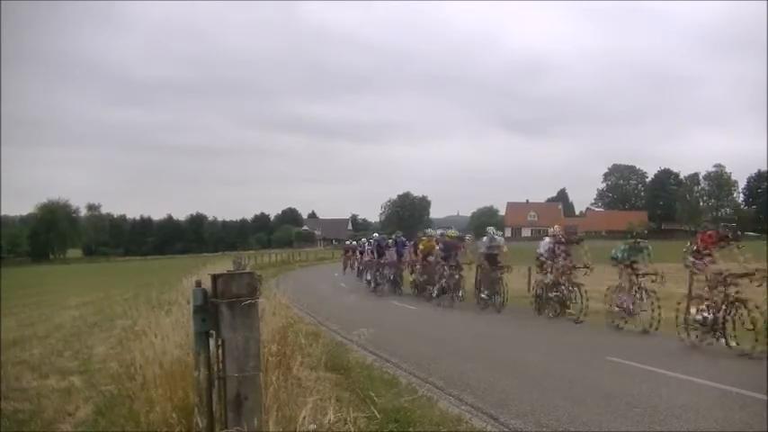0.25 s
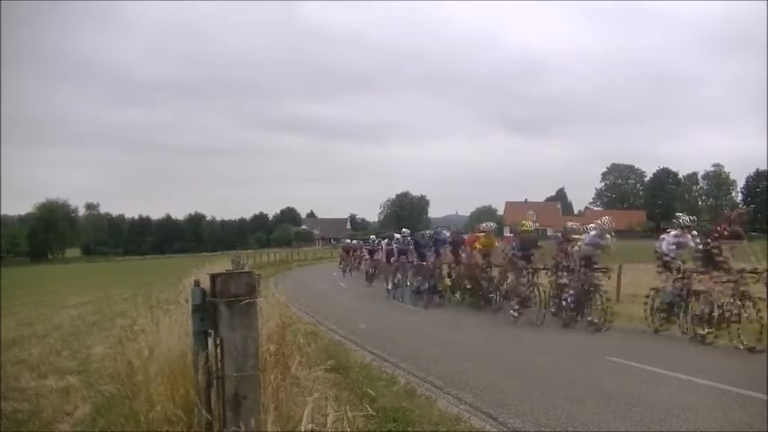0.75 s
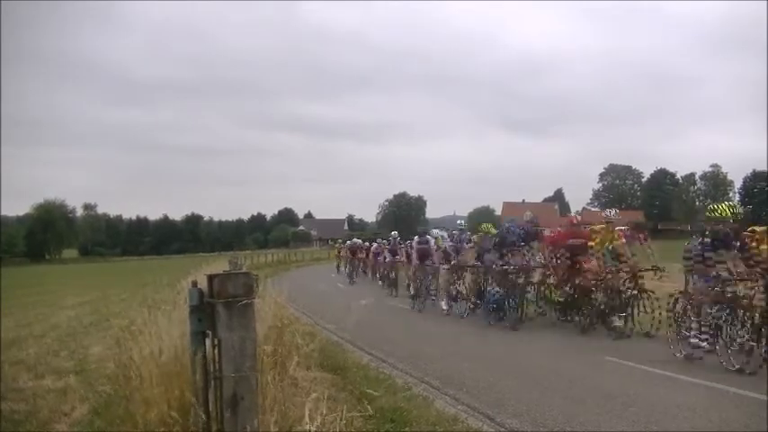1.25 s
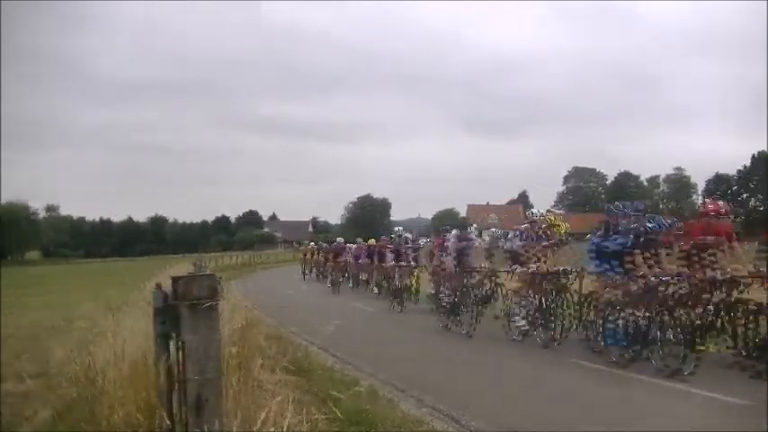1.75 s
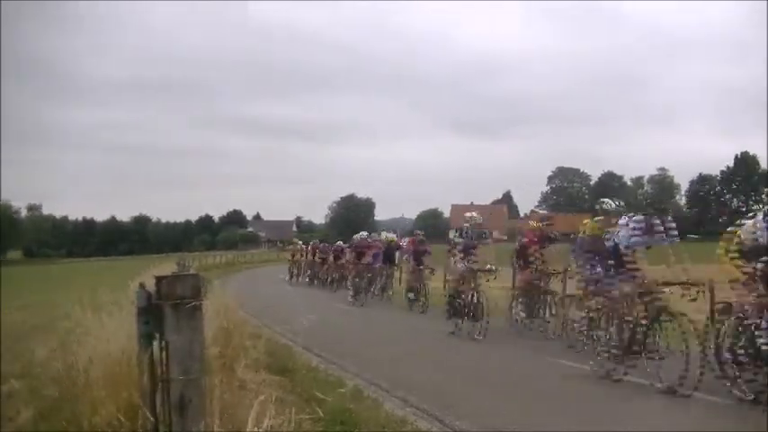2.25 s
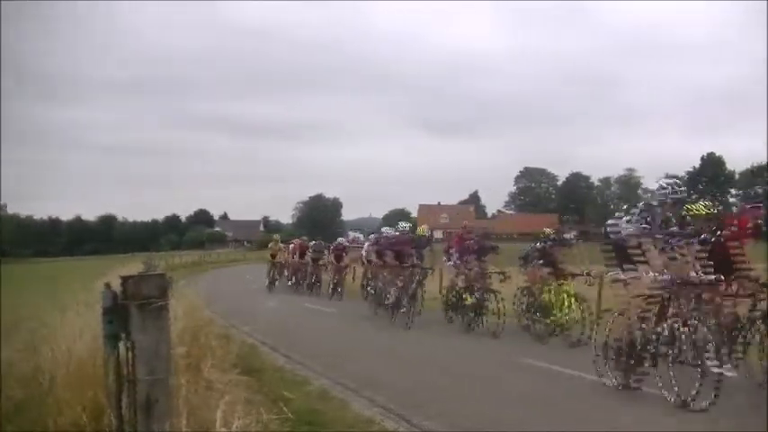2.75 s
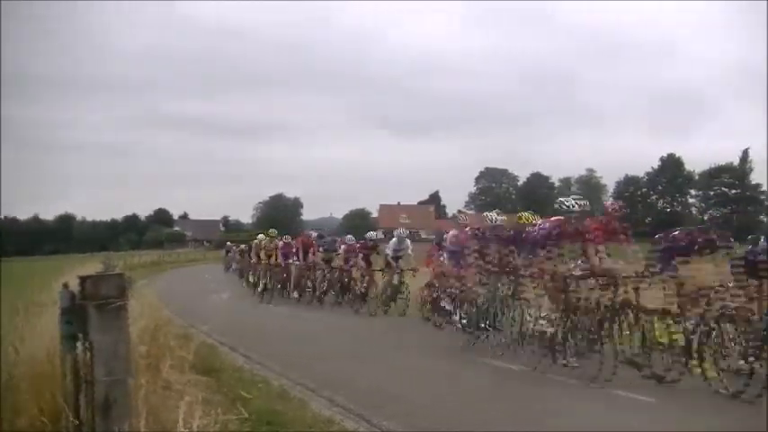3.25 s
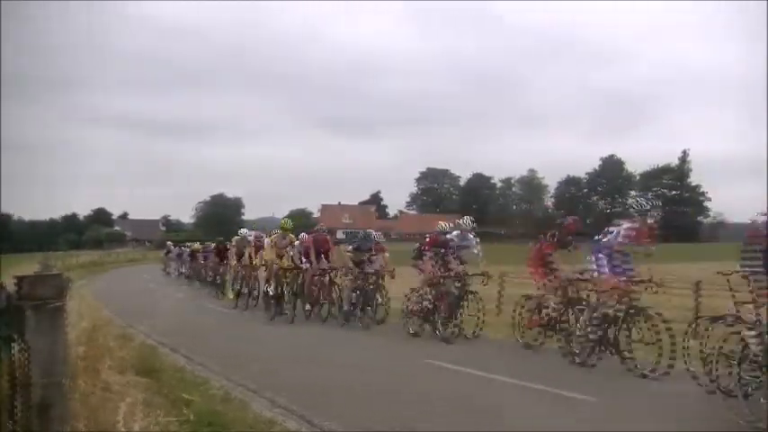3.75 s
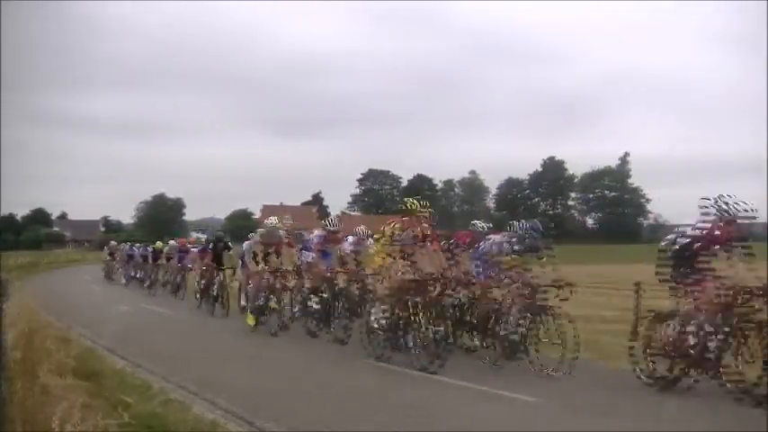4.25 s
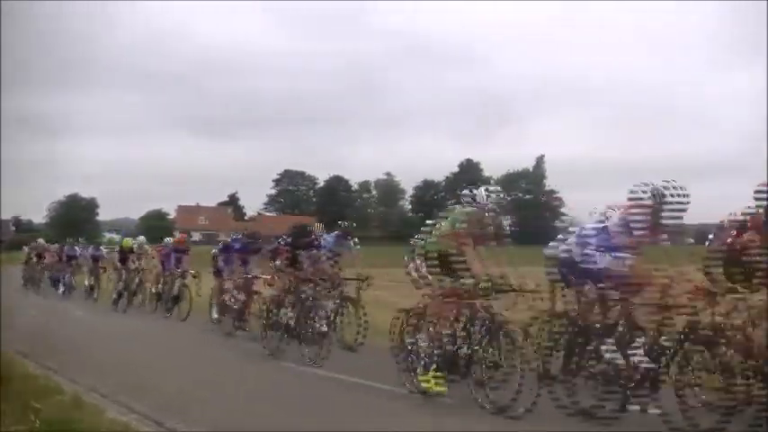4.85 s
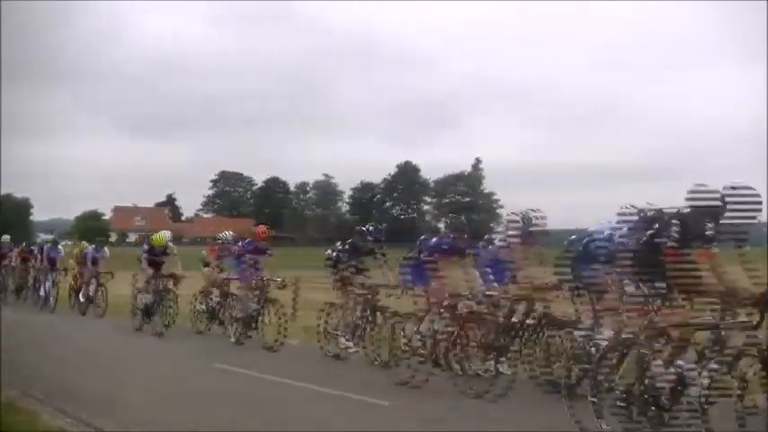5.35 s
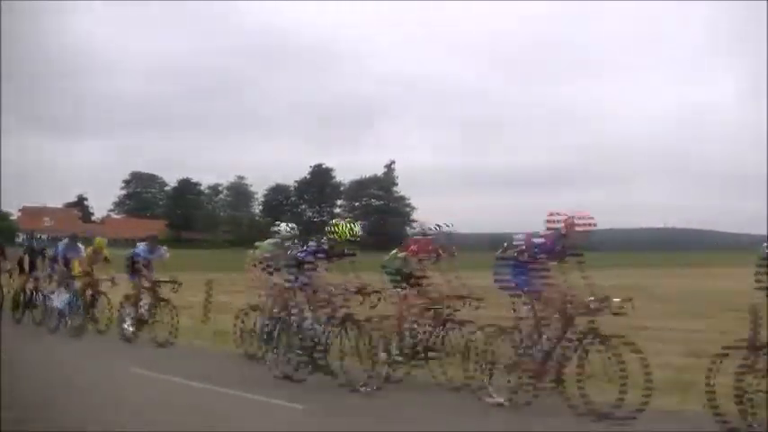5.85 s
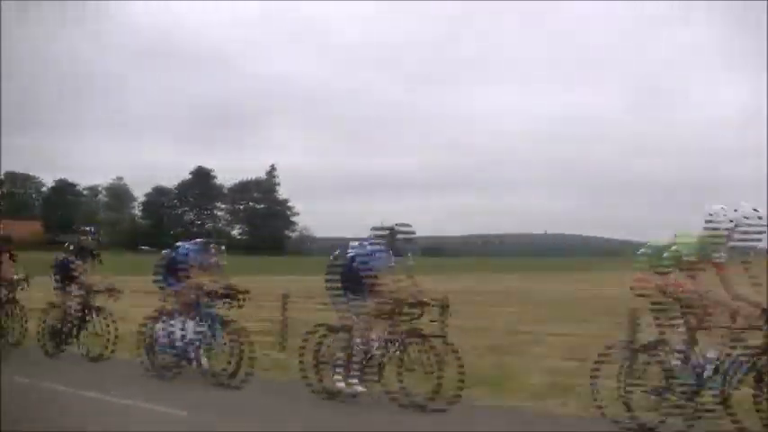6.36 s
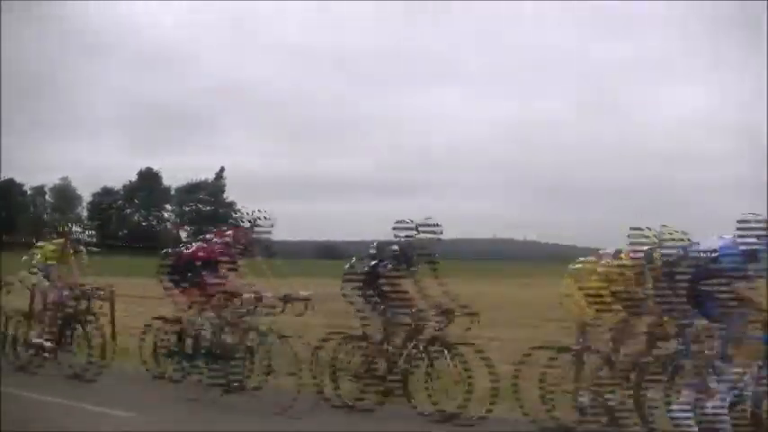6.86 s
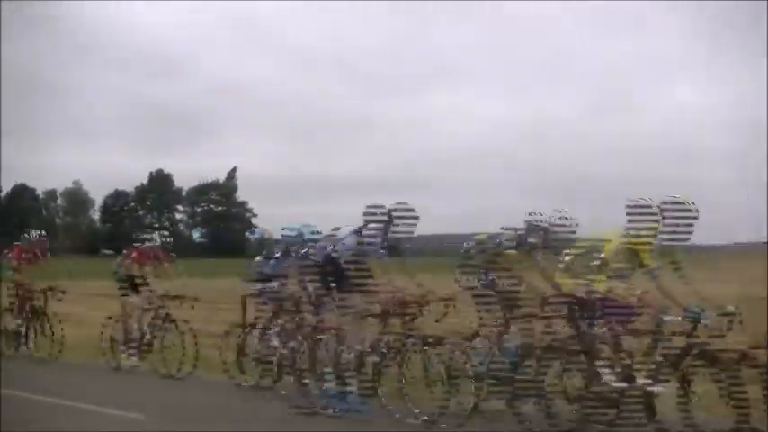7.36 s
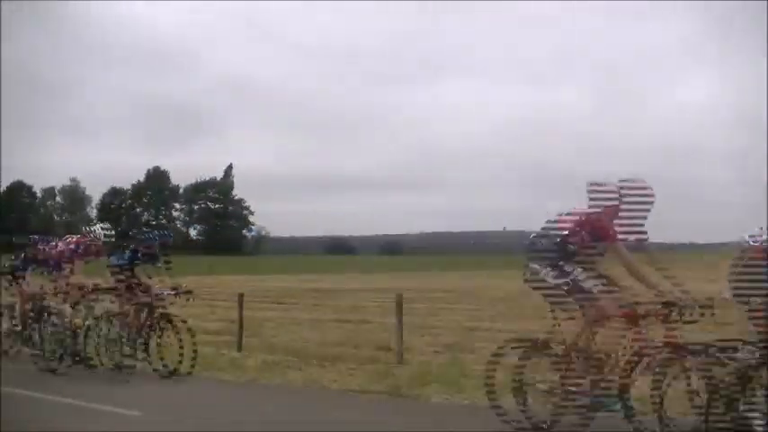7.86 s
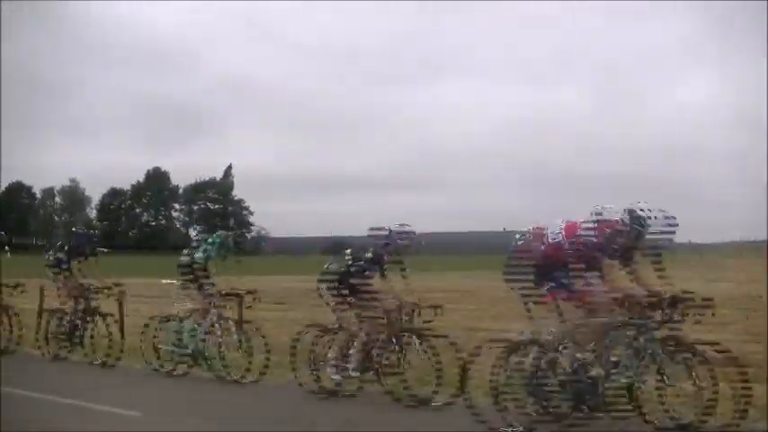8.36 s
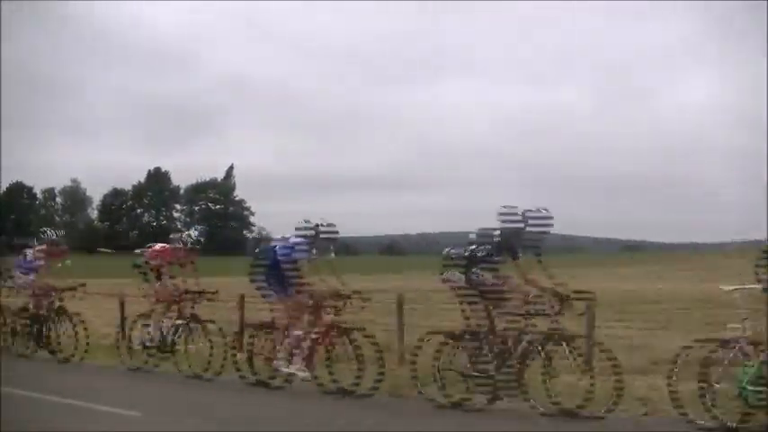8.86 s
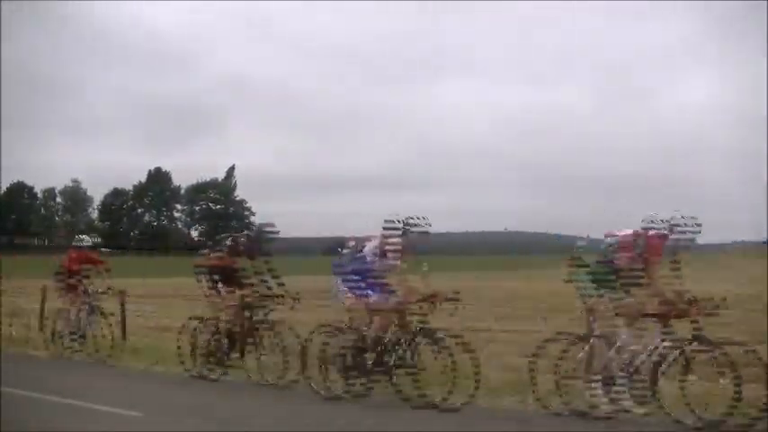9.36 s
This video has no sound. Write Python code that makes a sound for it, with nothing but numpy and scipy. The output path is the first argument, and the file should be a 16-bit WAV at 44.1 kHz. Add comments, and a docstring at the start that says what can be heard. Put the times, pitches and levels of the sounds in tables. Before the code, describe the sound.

Outdoors beside a road, tyres hiss and chains whirr continuously as a pack of racing bikes streams by, a little louder midway. Small ticks, short freewheel ratchets and a couple of bright chain clacks stand out. Near the end come dull knocks on the microphone, low gusts of wind, a brief dropout and a hard snap like a flung stone.

```python
"""Tyres hiss on asphalt as a peloton of racing bicycles streams past a hand-held camera a few metres away.
Spokes cut the air, chains whirr, freewheels ratchet, gears and grit tick. A chain clacks loudly on a frame;
later something snaps sharply. Late on, the camera is bumped, wind buffets its two ports
and the sound cuts out for a third of a second."""
import sys
import numpy as np
from scipy import signal
from scipy.fft import rfft, irfft, next_fast_len
from scipy.io import wavfile
from scipy.ndimage import uniform_filter1d

SR = 44100
rng = np.random.default_rng(int(sys.argv[2]) if len(sys.argv) > 2 else 0)


def bounce(signal):
    """Save signal as a 16-bit WAV file at the path given by the first command-line argument."""
    frames = np.transpose(np.atleast_2d(signal))
    limited = np.clip(frames, -1, 1)
    pcm = np.round(limited * 32767).astype(np.int16)
    wavfile.write(sys.argv[1], SR, pcm)


N = 423801
TIME = np.arange(N) / SR

# groups with noisier chains and spokes: t/s, half length/s, lift/dB
WHIRR_SWELLS = [(1.6, 3.3, 2.2), (3.65, 0.47, 3), (7.9, .12, 3.5)]


def undb(db):
    """Decibels to gain."""
    return 10 ** (np.asarray(db) / 20)


def unit(x):
    """Scale to rms 1."""
    return x / np.sqrt(np.mean(x ** 2))


def across(points, freqs):
    """Read (f/Hz, value) points on a log-frequency axis."""
    hz, value = np.transpose(points)
    return np.interp(np.log(freqs + 1), np.log(hz + 1), value)


def spectrum(x):
    """Spectrum and its axis in Hz."""
    size = next_fast_len(N, True)
    return rfft(x, size), np.arange(size // 2 + 1) * SR / size


def colour(x, points):
    """Shape by (f/Hz, level/dB) points, at rms 1."""
    bins, freqs = spectrum(x)
    return unit(irfft(bins * undb(across(points, freqs)))[..., :N])


def band(x, hz, width_hz):
    """One resonance, gain 1 at its centre."""
    return signal.lfilter(*signal.iirpeak(hz, hz / width_hz, fs=SR), x)


def lift(x, hz, width_hz, db):
    """Raise or lower one band."""
    return x + (undb(db) - 1) * band(x, hz, width_hz)


def high_pass(x, hz, order):
    """Butterworth bass cut."""
    return signal.sosfilt(signal.butter(order, hz, "high", fs=SR, output="sos"), x)


def walk(rate_hz):
    """Smooth random wander, rms 1."""
    hold = int(SR / rate_hz)
    steps = np.repeat(rng.standard_normal(N // hold + 1), hold)[:N]
    return unit(uniform_filter1d(uniform_filter1d(steps, hold), hold))


def fade(t, t60_s):
    """Exponential decay, 60 dB down at t60_s."""
    return np.exp(-np.log(1000) * t / t60_s)


def add(out, s, x):
    """Mix x in at time s."""
    start = max(int(s * SR), 0)
    out[..., start:start + x.shape[-1]] += x[..., :N - start]


def swells(groups):
    """Lift in dB as each group passes."""
    return sum(db * np.exp(-((TIME - s) / half_s) ** 2) for s, half_s, db in groups)


def grit(rate_hz, spread_db):
    """Dense tiny impacts, a few much harder than the rest."""
    hits = rng.random(N) < rate_hz / SR
    hardness = np.minimum(rng.exponential(size=N), 5)
    return unit(hits * rng.standard_normal(N) * undb(spread_db * hardness))


def ports(direct, scattered):
    """Two close ports: alike in the treble, apart in level and phase lower down."""
    # coherence of the ports: f/Hz, likeness/0-1
    coherence = [(60, .8), (130, .3), (290, 0.34), (640, 0.94), (1410, 0.8), (3100, 0.92), (6820, 0.91),
                 (15000, .99)]
    # left minus right: f/Hz, level/dB
    balance = [(110, 0), (200, 3), (380, 3.5), (700, 1.5), (1290, -2), (2380, -2.5), (4400, -.3), (9000, 0)]
    # left lead: f/Hz, phase/rad
    lead = [(60, 0), (340, -.6), (1100, -.6), (2000, -.15), (3450, .2), (4900, 0), (5700, .2), (7600, -.3),
            (8600, 0)]
    (mid, side), freqs = spectrum(np.array([direct, scattered]))
    likeness = np.sqrt(across(coherence, freqs))
    mid = mid * np.sqrt((1 + likeness) / 2)
    side = side * np.sqrt((1 - likeness) / 2)
    lean = undb(across(balance, freqs) / 2) * np.exp(.5j * across(lead, freqs))
    return irfft(np.array([(mid + side) * lean, (mid - side) / lean]))[:, :N]


def wind(breeze_db=-62.5, rise_s=.04, fall_s=.032):
    """Gusts rise, hold and die; their eddies push on one port while pulling on the other."""
    # gusts: t/s, hold/s, level/dB
    gusts = [(5.08, .04, -48), (6.96, 0.13, -46), (7.46, 0.026, -33.5), (8.03, 0.048, -44),
             (8.24, .09, -43), (8.442, 0.5, -34.5), (8.624, 0.032, -34), (8.86, .03, -35.5),
             (9.078, .07, -37.5), (9.345, 0.078, -40), (9.51, .1, -37)]
    # eddy spectrum: f/Hz, level/dB
    eddies = [(40, -45), (100, -33), (180, -14.5), (280, -4.5), (380, -3.5), (500, -5), (700, -4),
              (1000, -12.5), (2000, -36), (5000, -78)]
    force = undb(breeze_db)
    for s, hold_s, db in gusts:
        early, late = np.maximum(s - TIME, 0), np.maximum(TIME - s - hold_s, 0)
        force = force + undb(db) * np.exp(-early / rise_s - late / fall_s)
    left, own = colour(rng.standard_normal((2, N)), eddies)
    right = unit(.68 * own - left)
    flutter = unit(undb(1.9 * walk(90) + 1.5 * walk(25)))
    return np.array([undb(2.5) * left, undb(-3) * right]) * flutter * force


def thumps(cycles=.6, lead_s=.01, body_hz=158.4):
    """Dull knocks on the camera, one leaving its body humming, and a last pop of wind on the microphone."""
    # single-swing pulses: t/s, level/dB, f/Hz, right/left gain, body hums
    pulses = [(6.932, -35, 199, 1.5, False), (6.971, -22.5, 207, 0.7, True), (7.067, -25, 330, -2, False),
              (7.285, -30, 373, 0.84, False), (7.362, -22.5, 342, 1, False), (7.495, -23, 383, -0.3, False)]
    out, t = np.zeros((2, N)), np.arange(SR // 2) / SR
    for s, db, hz, right, hums in pulses:
        turns = hz * (t - lead_s)
        pulse = undb(db) * np.cos(2 * np.pi * turns) * np.exp(-(turns / cycles) ** 2)
        add(out, s - lead_s, np.array([pulse, right * pulse]))
        if hums:
            add(out, s, undb(-33.5) * np.sin(2 * np.pi * body_hz * t) * fade(t, t60_s=.36))
    return high_pass(out, 146, order=3)


def ticks():
    """Short bright bursts from gear changes and flung grit."""
    # ticks: t/s, level/dB, f/Hz
    bursts = [(1.608, -38, 12500), (2.354, -25, 5500), (3.709, -28, 8600), (3.952, -31, 9000),
              (4.206, -22, 4600), (4.517, -28, 11500), (4.895, -17, 3880), (6.967, -23, 6000),
              (7.359, -19, 5470), (7.382, -24, 4250), (8.011, -29, 6800), (8.747, -29, 6300),
              (9.081, -16, 3770)]
    out, t = np.zeros(N), np.arange(SR // 12) / SR
    for s, db, hz in bursts:
        burst = band(band(rng.standard_normal(len(t)), hz, hz / 2), hz, hz / 2)
        add(out, s, undb(db) * unit(burst) * fade(t, t60_s=.02))
    return out


def freewheels(pawl_hz=283.4, decay_cycles=.26):
    """Pawls snap over the ratchet while a rider stops pedalling."""
    # coasting spells: t/s, half length/s, level/dB, ring f/Hz
    coasts = [(0.033, .08, -31, 1990), (1.069, .05, -34, 4670), (1.844, .065, -27.5, 4800),
              (4.244, 0.054, -30.5, 4380), (4.903, .12, -30.5, 4300), (6.718, .17, -30.5, 1740),
              (7.401, 0.12, -28.5, 1820)]
    out, t = np.zeros(N), np.arange(SR // 2) / SR
    for s, half_s, db, hz in coasts:
        start_s = max(s - t[-1] / 2, 0)
        pawls = rng.standard_normal(len(t)) * np.exp(-(pawl_hz * t % 1) / decay_cycles)
        ring = band(band(pawls, hz, .23 * hz), hz, .23 * hz)
        swell = np.exp(-((start_s + t - s) / half_s) ** 2) * signal.windows.tukey(len(t), .1)
        add(out, start_s, undb(db) * unit(ring) * swell)
    return out


def clacks(crack_db=-20):
    """In a gear change the chain strikes the frame and its links rattle, ringing the tubes."""
    # chain strikes: t/s, level/dB, rattle t60/s, blow f/Hz
    strikes = [(1.309, -10, .012, 2600), (1.3103, -9.5, 0.018, 4400), (1.3124, -14, 0.02, 2200),
               (1.32, -15, .05, 4200), (1.351, -21, .03, 2400), (4.2574, -14, 0.014, 4500)]
    # frame modes: f/Hz, level/dB, t60/s
    modes = [(1950, -4, .018), (2420, -2, .015), (2620, -3, .01), (3950, -6, .005), (4600, -2, .007),
             (4950, -3, .005), (7700, -17, .007), (10400, -30, .007)]
    out, t = np.zeros(N), np.arange(SR // 8) / SR
    for s, db, rattle_s, blow_hz in strikes:
        blow = .18 * rng.standard_normal(len(t)) * fade(t, rattle_s)
        blow[0] += 1
        ring = undb(crack_db) * band(rng.standard_normal(len(t)), 4000, 4000) * fade(t, .003)
        for hz, mode_db, t60_s in modes:
            drive = undb(mode_db) / (1 + np.log2(hz / blow_hz) ** 2)
            ring += drive * np.sin(2 * np.pi * hz * t) * fade(t, t60_s)
        # thin tubes radiate no bass
        clack = high_pass(signal.fftconvolve(blow, ring)[:len(t)], 1100, order=3)
        peak_rms = np.sqrt(np.max(uniform_filter1d(clack ** 2, size=40)))
        add(out, s, undb(db) * clack / peak_rms)
    return out


def snap(at_s=8.2213, gain_db=7.5, contact_s=.00045):
    """A small hard blow nearby, perhaps a flung stone: builds over the contact, rings briefly."""
    # ring modes: f/Hz, level/dB, t60/s
    modes = [(3100, 6, .0028), (3850, -10, .007), (4510, -5, .011), (5500, -5, .003), (7400, -10, .003),
             (11000, -24, .003)]
    out, t = np.zeros(N), np.arange(SR // 20) / SR
    ring = sum(undb(db) * np.sin(2 * np.pi * hz * t) * fade(t, t60_s) for hz, db, t60_s in modes)
    contact = 1 - np.exp(-(t / contact_s) ** 2)
    add(out, at_s, undb(gain_db) * high_pass(ring * contact, 900, order=2))
    return out


def chains(top_db):
    """Rollers drop on to sprockets in a high, gritty whirr."""
    # chain spectrum: f/Hz, level/dB
    shape = [(4000, -40), (5600, -4), (6400, -5), (7400, 1), (8100, -2.5), (8900, -10), (9400, -8.5),
             (10000, -11), (10500, -8.5), (11500, -15), (14500, -11.5), (16000, -14.5)]
    whirr = colour(rng.standard_normal(N) + .47 * grit(rate_hz=1900, spread_db=5), shape)
    whirr = lift(whirr, 13500, 5000, top_db)
    return whirr * undb(-17.5 + swells(WHIRR_SWELLS) + .85 * walk(70))


def spokes():
    """Spokes cut the air with a wavering hiss."""
    # spoke spectrum: f/Hz, level/dB
    shape = [(1800, -46), (3000, 0), (3700, -2.5), (4550, -1), (5200, -5), (5800, -13), (6400, -24.5),
             (9000, -37.5)]
    hiss = colour(rng.standard_normal(N) + .45 * grit(rate_hz=1100, spread_db=3.5), shape)
    return hiss * undb(-4.5 + .31 * swells(WHIRR_SWELLS) + .6 * walk(22))


def wheels(speed_m_s=16.4, echo_gain=.31, riders=44):
    """Rolling noise at even power; each rider's road echo sweeps a soft comb through it."""
    out, power = np.zeros(N), np.full(N, 1e-9)
    for k, (late, lane) in enumerate(rng.random((riders, 2))):
        abreast_s = (k + late) / riders * (TIME[-1] + 2) - 1
        near = np.flatnonzero(np.abs(TIME - abreast_s) < 1.2)
        offset_m = 4 + 3 * lane
        distance_m = np.hypot(offset_m, speed_m_s * (TIME[near] - abreast_s))
        detour_m = .5 / distance_m
        roll = rng.standard_normal(len(near))
        echo = np.interp(near - detour_m / 343 * SR, near, roll)
        gain = offset_m / distance_m * signal.windows.tukey(len(near))
        out[near] += (roll + echo_gain * echo) * gain
        power[near] += gain ** 2
    return unit(out / np.sqrt(power))


def tyres(top_db):
    """Tyres roar on coarse asphalt, and deep-rim wheels hum as groups pass."""
    # tyre spectrum: f/Hz, level/dB
    shape = [(60, -48), (125, -46.5), (200, -33), (280, -23), (370, -19.5), (500, -13), (660, -9.5),
             (800, -4.5), (1100, -3), (1500, 0.5), (2100, 3), (2700, 1), (3400, -16.5), (4500, -29),
             (6400, -40.5)]
    # steady peaks in the roar, as from a short echo near the microphone: f/Hz, width/Hz, lift/dB
    ripples = [(305, 41, 3), (510, 49, 2), (828, 130, 3), (1050, 23, 1.5), (1360, 120, 2), (1960, 160, 0.5)]
    # groups on humming deep-rim wheels: t/s, half length/s, lift/dB
    humming = [(3.98, 0.49, 4), (4.95, .65, 4), (8.0, .45, 5.5)]
    roar = colour(wheels() + .27 * grit(rate_hz=1500, spread_db=2), shape)
    for hz, width_hz, db in ripples:
        roar = lift(roar, hz, width_hz, db)
    roar = lift(roar, 2750, 760, .22 * top_db)  # upper hiss
    roar = lift(roar, 1390, 450, swells(humming) - 1.5)
    return unit(roar) * undb(.22 * walk(14))


def peloton(far_db=-8, near_db=1.5, closing_s=6.3):
    """The bunch thickens, then thins; air and grass dull the far first riders, later ones are closer."""
    # riders near the verge, brighter still: t/s, half length/s, lift/dB
    close_riders = [(2.35, .35, 7), (7.25, .35, 2.5), (7.95, 0.18, 2)]
    # loudness of the bunch: t/s, level/dB
    bunch = [(0, -27), (.7, -28), (1.9, -26.5), (3.0, -24), (3.5, -25), (4.5, -24.5), (5.25, -23),
             (6.1, -24.5), (7.15, -26), (7.42, -25), (7.9, -27), (8.2, -25), (9.0, -27), (9.6, -27.5)]
    top_db = np.interp(TIME, [0, closing_s], [far_db, near_db]) + swells(close_riders)
    level_db = np.interp(TIME, *np.transpose(bunch))
    return (tyres(top_db) + spokes() + chains(top_db)) * undb(level_db)


def scene():
    """The road in stereo, plus wind and thumps at the camera."""
    road = ports(direct=peloton() + freewheels(), scattered=peloton())
    return road + clacks() + ticks() + snap() + wind() + thumps()


def record(dry, mute_from_s=7.5545, mute_to_s=7.887, top_hz=15700):
    """Peaks are rounded without adding bass, the sound drops out briefly, the top is cut."""
    rounded = dry / (1 + (dry / .98) ** 6) ** (1 / 6)
    sound = dry + high_pass(rounded - dry, 400, order=2)
    live = (TIME < mute_from_s) | (TIME > mute_to_s)
    return signal.sosfilt(signal.ellip(12, .1, 90, top_hz, fs=SR, output="sos"), sound * live)


dry = scene()
out = record(dry)
bounce(out)
```